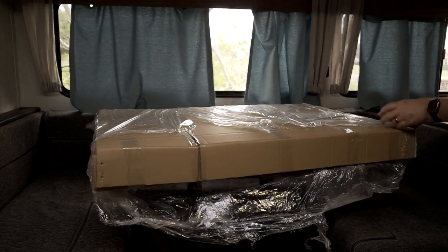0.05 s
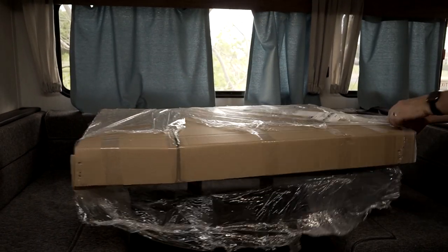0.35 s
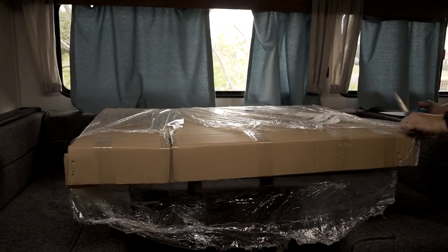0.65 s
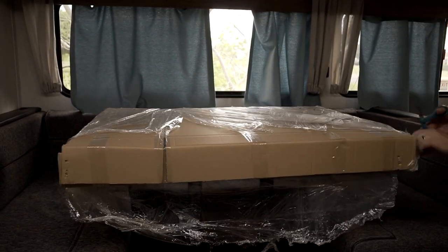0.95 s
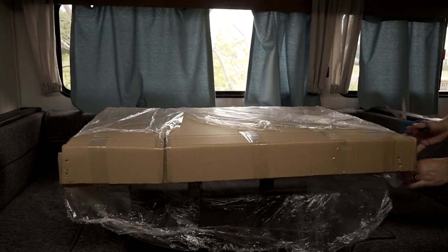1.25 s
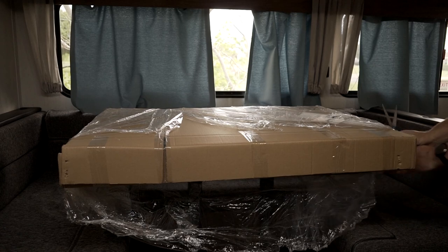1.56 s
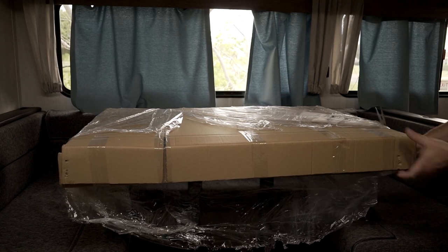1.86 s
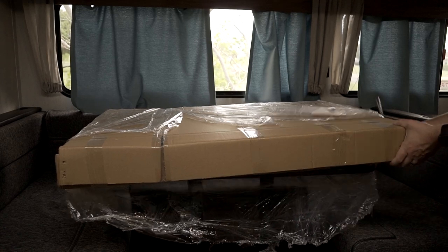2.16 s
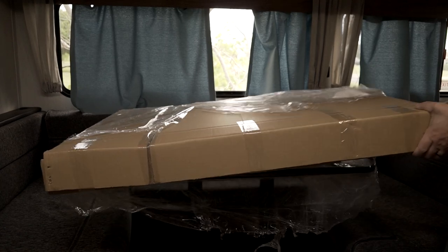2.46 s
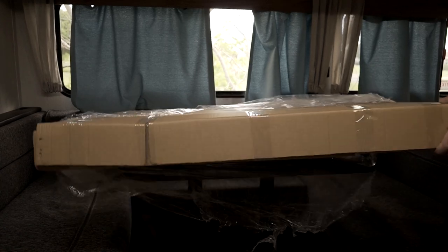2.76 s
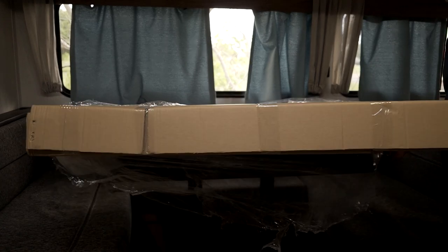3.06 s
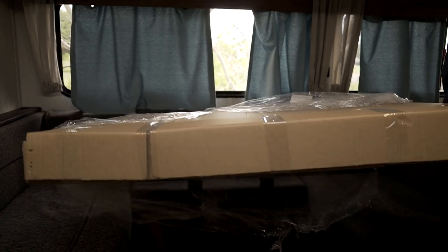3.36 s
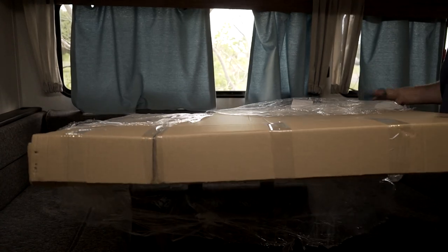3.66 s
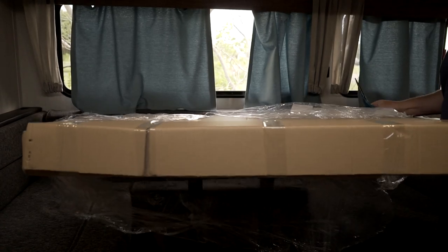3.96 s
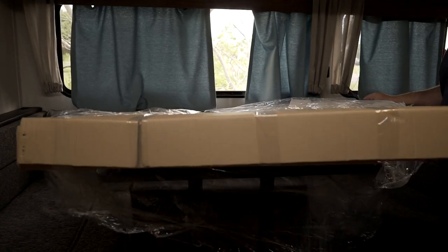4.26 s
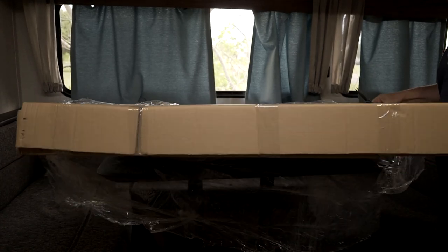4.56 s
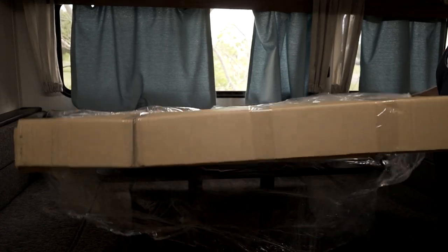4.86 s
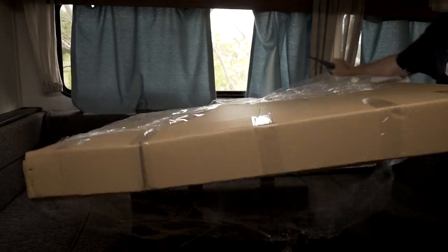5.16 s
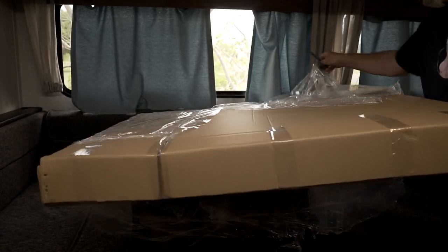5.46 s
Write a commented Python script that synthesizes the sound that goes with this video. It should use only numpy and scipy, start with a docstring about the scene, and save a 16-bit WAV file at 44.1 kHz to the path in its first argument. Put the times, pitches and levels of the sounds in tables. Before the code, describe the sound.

Clear plastic wrap crinkles and snaps in uneven tugs as it is pulled off a big cardboard box that scrapes and bumps.

```python
"""Clear plastic wrap crinkles as it is pulled off a big cardboard box, shifted and lifted in a camper cabin.
Each tug makes thousands of creases buckle (snap-through), singly and in flurries, and clinging film
peels off in a row of ticks. Stick-slip friction and impacts excite the panel modes of the box, which
drums, bumps and judders. The small, padded cabin adds a faint rumble and a short, dense reverberation."""
import sys
import numpy as np
from scipy import signal
from scipy.fft import rfft, irfft
from scipy.io import wavfile

SR = 44100
rng = np.random.default_rng(int(sys.argv[2]) if len(sys.argv) > 2 else 0)


def generate_wav(signal):
    """Clip the signal to [-1, 1] and save it as 16-bit WAV at the path in sys.argv[1]."""
    frames = np.transpose(np.atleast_2d(signal))
    scaled = np.clip(frames, -1, 1) * 32767
    pcm = np.round(scaled).astype(np.int16)
    wavfile.write(sys.argv[1], SR, pcm)


N = 242550
TIME = np.arange(N) / SR
CABIN_T60_S = 0.12


def undb(db):
    """Amplitude ratio of a level in decibels."""
    return 10 ** (np.asarray(db) / 20)


def unit(x):
    """Normalisation to rms 1."""
    return x / np.sqrt(np.mean(x ** 2))


def curves(table):
    """Linear interpolation of each column over time."""
    s, *columns = np.transpose(table)
    return [np.interp(TIME, s, c) for c in columns]


def add(out, s, sound):
    """Superposition of a sound from time s."""
    start = max(int(s * SR), 0)
    out[:, start:start + sound.shape[1]] += sound[:, :N - start]


def ring(x, hz, width_hz):
    """Damped resonance: two poles, gain 1 at the centre."""
    w = 2 * np.pi * min(hz, .45 * SR) / SR
    a = np.sin(w) * width_hz / hz / 2
    return signal.lfilter([a, 0, -a], [1 + a, -2 * np.cos(w), 1 - a], x + 1e-18)


def band(x, hz, width_hz):
    """Two resonators in cascade: a short rounded ring with steep skirts."""
    return ring(ring(x, hz, width_hz), hz, width_hz)


def colour(x, points, size=4096):
    """Minimum-phase filter through (f/Hz, gain/dB) points, built from the folded cepstrum."""
    hz, db = np.transpose(points)
    bins = np.maximum(np.arange(size // 2 + 1) * SR / size, 1)
    gain = undb(np.interp(np.log(bins), np.log(hz), db))
    cepstrum = irfft(np.log(gain))
    cepstrum[1:size // 2] *= 2
    cepstrum[size // 2 + 1:] = 0
    response = irfft(np.exp(rfft(cepstrum))).reshape((1,) * (x.ndim - 1) + (-1,))
    return signal.oaconvolve(x, response, axes=-1)[..., :x.shape[-1]]


def wander(rate):
    """Random modulation: `rate` Gaussian values a second, joined linearly; rms 1."""
    steps = np.random.default_rng(rng.integers(2 ** 31)).standard_normal(N // 100)
    return unit(np.interp(TIME * rate, np.arange(len(steps)), steps))


def clicks(rate, spread_db, size=N):
    """Poisson process: `rate` impulses a second from random directions, as mid and side; rms 1."""
    chance = np.clip(rate / SR, 1e-5, 1) * np.ones(size)
    at = np.flatnonzero(rng.random(size) < chance)
    strength, sign, direction = np.random.default_rng(rng.integers(2 ** 31)).random((len(at), 3)).T
    rank = -np.log(strength + .006)  # many small, few large
    out = np.zeros((2, size))
    out[0, at] = np.sign(sign - .5) * undb(spread_db * rank) / np.sqrt(chance[at])
    out[1, at] = out[0, at] * np.sqrt(2) * np.cos(np.pi * direction)
    return unit(out + 1e-12)


def scatter(x, wet_db):
    """Diffuse reverberation: each slip comes from a new spot and has its own decaying reflections."""
    keep = undb(-120 / (CABIN_T60_S * SR))  # energy left after one sample
    energy = signal.lfilter([0, 1 - keep], [1, -keep], x[0] ** 2 + 1e-18)
    spray = np.sqrt(energy) * rng.standard_normal(x.shape)
    return (x + undb(wet_db) * spray) / np.sqrt(1 + undb(wet_db) ** 2)


def early_echoes(x, wet_db, size=1200):
    """Interference: unchanging reflections from the nearest walls and the window colour the sound."""
    t = np.arange(size) / SR
    echoes = rng.standard_normal((2, size)) * undb(-60 * t / CABIN_T60_S) * (t > .002)
    return x + undb(wet_db) * signal.oaconvolve(x[:1], unit(echoes) / np.sqrt(size), axes=1)[:, :N]


# Spectrum of the still cabin: f/Hz, gain/dB
CABIN_SPECTRUM = [(20, -20), (50, -16), (100, -2), (300, 0), (1000, -4.5), (16000, -36)]
# Course of its rumble: t/s, level/dB
RUMBLE_LEVELS = [(0, -68), (1, -66), (3, -62), (5.5, -57.5)]
def cabin_rumble():
    """Filtered Gaussian noise: a faint low rumble that slowly grows."""
    level_db, = curves(RUMBLE_LEVELS)
    return undb(level_db) * unit(colour(rng.standard_normal((2, N)), CABIN_SPECTRUM))


# Stirred film crinkling between tugs: t/s, level/dB, tautness/dB (fine creases up, broad folds down)
SETTLING = [(0, -41.5, 1), (.1, -46, 1), (.4, -37, -0.5), (1.1, -36.5, 2.5), (1.65, -40, 0),
            (1.87, -43, -1), (3.6, -44.5, 1.5), (4.35, -51, 2), (4.47, -48, 4), (4.72, -51, 3),
            (5.5, -45.5, 2)]
# Tugs on the film: t/s, rise/s, hold/s, release/s, crinkle level/dB, share of broad folds/dB,
# share of fine creases/dB, drag level/dB, drumming level/dB
TUGS = [(0.141, 0.022, 0.0092, 0.038, -34, -10, 0, -35.5, -52),
        (0.221, 0.039, 0.016, 0.077, -26, -5, -4.5, -33, -43.5),
        (0.411, .02, 0.087, .11, -39, -11, -3, -36, -51),
        (0.798, 0.01, 0.0049, 0.03, -28, -19, -3, -34.5, -51),
        (1.222, .045, .035, 0.036, -26.5, -1, 2.5, -31, -49), (1.349, .03, .01, .04, -32, 1, 4.5, -37, -65),
        (1.471, 0.059, .02, 0.048, -32.5, 0, 1, -42.5, -58),
        (1.699, 0.013, 0.024, 0.068, -31.5, -1.5, -3.5, -42.5, -52),
        (1.917, 0.029, 0.066, 0.049, -38, -1, 1, -45.5, -53),
        (2.11, .05, .025, 0.069, -27.5, -1, 0.5, -31.5, -45),
        (2.19, .07, .03, .18, -27, -3, 2.5, -34.5, -47),
        (2.418, .06, 0.14, 0.081, -29, -1.5, 1, -35.5, -52),
        (2.717, 0.018, .24, 0.28, -35, 0.5, 0.5, -37.5, -48),
        (3.124, .025, 0.088, 0.046, -30, -1.5, -2.5, -35.5, -51),
        (3.167, .028, 0.01184, 0.039, -38, 1, -19, -28, -52),
        (3.324, 0.018, 0.0054, 0.028, -42, 2, -14, -46, -66),
        (3.439, 0.041, 0.034, 0.038, -41.5, 1, 1.5, -46, -62),
        (3.75, 0.023, 0.059, 0.088, -37.5, 0, 2, -43.5, -54),
        (4.077, .06, 0.063, 0.024, -41, 0.5, -4.5, -38.5, -50.5),
        (4.367, 0.039, 0.014, 0.043, -52.5, 0, 3, -46, -49.5),
        (4.762, 0.13, .03, .245, -24.5, -2, 1, -27.5, -41.5),
        (5.186, 0.021, 0.0058, .03, -33.5, -6, 6, -55, -62)]
def tugging(rest_slack_db=-0.5, brush_mean_db=-47, brush_follow=0.39, rest_drum_db=-12.5):
    """Incoherent sources add in power: tugs and settling film give the five dB curves of TUGS."""
    rest_db, tension_db = curves(SETTLING)
    brush_db = brush_mean_db + brush_follow * (rest_db - rest_db.mean())  # loose film brushes the box
    power = undb([rest_db, rest_db + rest_slack_db - tension_db, rest_db + tension_db,
                  brush_db, brush_db + rest_drum_db]) ** 2
    for s, rise, hold, release, db, slack_db, taut_db, drag_db, drum_db in TUGS:
        fade = np.exp(-np.maximum(TIME - s - rise - hold, 0) / release)
        effort = np.clip((TIME - s) / rise, 0, 1) * fade
        power += np.outer(undb([db, db + slack_db, db + taut_db, drag_db, drum_db]) ** 2, effort ** 2)
    crinkle, broad, fine, drag, drum = power
    return 10 * np.log10([crinkle, broad / crinkle, fine / crinkle, drag, drum])


# Spectrum of the crinkling film: f/Hz, gain/dB
FILM_SPECTRUM = [(400, -31), (900, -17), (1400, -5), (2000, 0.5), (3000, 0.5), (4500, 0), (7000, -2),
                 (9500, -6.5), (12500, -7.5), (16000, -11.5)]
def crinkling(level_db, slack_db, taut_db, crowding=.45, breadth=0.98, gain_db=7.0, bands=12):
    """Buckling: creases of many sizes snap and ring for a cycle or two; a harder pull sets off more."""
    out = 0
    snaps_per_s = 420 * undb(crowding * (level_db + 33))  # in each band
    for hz in np.geomspace(1200, 14000, bands):
        # slack film buckles in broad low folds, taut film in fine high creases
        broad = np.clip(np.log2(4300 / hz) * 0.96, 0, 1)
        fine = np.clip(np.log2(hz / 5000) * 1.3, 0, 1)
        pops = scatter(clicks(snaps_per_s, spread_db=0), wet_db=0)
        creases = unit(band(pops, hz, breadth * hz))
        out += creases * np.sqrt(hz / 5500 / bands) * undb(level_db + broad * slack_db + fine * taut_db)
    return undb(gain_db) * colour(out, FILM_SPECTRUM)


# Modes of the cardboard panels: f/Hz, bandwidth/Hz, gain/dB
PANEL_MODES = [(156.3, 5.8, 0.5), (214, 35, -1.5), (263, 46, 0), (304, 45, -13.5), (403, 84, 2),
               (534.5, 43, 10.5), (610, 76, 0.5), (758, 260, 0.5), (951, 78, -3.5), (1153, 41, -8),
               (1790, 110, -9.5)]
def cardboard(push, dead_db=-3):
    """Modal superposition: the box answers a force with a dead knock and its panel resonances."""
    return undb(dead_db) * push + sum(undb(db) * ring(push, hz, width) for hz, width, db in PANEL_MODES)


# Force spectrum of film dragging over cardboard: f/Hz, gain/dB
DRAG_SPECTRUM = [(250, -21), (420, -4), (540, -7.5), (700, -1), (850, 1.5), (1000, 2), (1300, 3.5),
                 (1800, 3), (3500, -21.5)]
# Force spectrum of the handling that drums the panels: f/Hz, gain/dB
DRUM_SPECTRUM = [(25, -16), (50, -20), (100, -41.5), (150, -3), (200, -4), (280, 1), (390, 2), (480, -5.5),
                 (800, -17.5)]
def rubbing(drag_db, drum_db):
    """Stick-slip friction at the contact patches shakes the box: a rasping drag and a low drumming."""
    drag_slips = scatter(clicks(rate=800, spread_db=1), wet_db=0.5)
    drum_slips = scatter(clicks(rate=600, spread_db=0), wet_db=-15.5)
    drag = unit(cardboard(colour(drag_slips, DRAG_SPECTRUM)))
    drum = unit(cardboard(colour(drum_slips, DRUM_SPECTRUM)))
    return drag * undb(drag_db - 0.5) + drum * undb(drum_db)


# The box landing on its support: t/s, level/dB, contact f/Hz, rise/s, relative thud level/dB
BUMPS = [(.157, -39, 249, .0026, -44), (.617, -42, 330, .0028, -44), (1.236, -23, 538.8, 0.00051, -42),
         (1.237, -32.5, 270.3, 0.001, -35), (1.378, -40.5, 280, 0.0016, -21), (1.762, -44, 350, .002, -34),
         (1.822, -44, 348.7, 0.0018, -36), (1.938, -38.5, 430, 0.002, -20),
         (2.583, -36, 341.2, 0.0017, -20.5), (2.729, -33.5, 660, 0.00089, -35),
         (3.186, -22, 496, 0.0058, -48), (3.205, -36.5, 400, 0.0036, -40), (3.782, -41.5, 490, 0.0014, -28),
         (4.325, -42.5, 421, .0024, -26), (4.884, -37, 300.3, 0.0031, -26)]
def bumps(breadth=0.95, decay_s=0.024, thud_hz=68, thud_decay_s=0.082, gain_db=-1, size=16000):
    """Impact excitation: a short scuff rings the panels, and the box's weight thuds in the support."""
    out, t = np.zeros((2, N)), TIME[:size]
    for s, db, hz, rise, thud_db in BUMPS:
        force = (1 - np.exp(-t / rise)) ** 2 * np.exp(-t / decay_s)
        force /= force.max()
        slips = clicks(rate=2500, spread_db=1, size=size)
        scuff = band(slips * force, hz, breadth * hz)
        knock = unit(cardboard(scuff, dead_db=-21)) * np.sqrt(np.mean(force ** 2))
        thud = unit(ring(slips, thud_hz, thud_hz)) * np.exp(-t / thud_decay_s) * undb(thud_db)
        add(out, s, (knock + thud) * undb(db + gain_db))
    return out


# Single stiff creases: t/s, peak level/dB, f/Hz
STIFF_CREASES = [(0.257, -14, 5500), (0.457, -19, 5160), (0.5117, -11.5, 5940), (.519, -15, 12240),
                 (.589, -16, 6500), (0.8059, -9, 6520), (0.9132, -20, 5500), (1.0242, -10, 10600),
                 (1.2373, -9.5, 5000), (1.3024, -12.5, 9000), (1.3464, -9, 7000), (2.741, -13.5, 4190),
                 (3.1438, -11.5, 8060), (3.3446, -27, 5950), (3.6967, -21, 6930), (4.14, -19, 6220),
                 (4.202, -18, 5400), (4.214, -19.5, 5600), (4.749, -21, 8140), (4.8298, -6.5, 7270),
                 (4.876, -9, 10170), (4.9, -8.5, 3673), (5.2093, -15, 8810)]
def snaps(rows, breadth=0.99, size=6000):
    """Snap-through: a stiff crease pops into a new shape with one sharp tick of two or three cycles."""
    out, pop = np.zeros((2, N)), signal.unit_impulse(size)
    for (s, db, hz), side in zip(rows, rng.uniform(-1, 1, len(rows))):
        tick = band(scatter(np.outer([1, side], pop), wet_db=2), hz, breadth * hz)
        add(out, s, tick / np.abs(tick[0]).max() * undb(db))
    return out


# Folds giving way: t/s, level/dB, f/Hz, bandwidth/Hz, decay/s
FLURRIES = [(0.33, -22.5, 3180, 3100, 0.014), (.416, -31.5, 1130, 600, 0.013),
            (.709, -25.5, 2097, 2000, .018), (.864, -27, 3200, 1400, .009), (.912, -28, 5000, 5010, .015),
            (.988, -29, 4970, 5000, .024), (1.02, -32, 10900, 4000, 0.037),
            (1.238, -23.5, 2280, 4000, 0.016), (1.269, -30, 5500, 7000, 0.019),
            (1.377, -18, 2800, 3000, 0.0055), (2.116, -28, 4220, 6000, 0.043),
            (2.136, -23.5, 7100, 9000, 0.013), (2.144, -26, 1920, 900, .03),
            (2.257, -25, 8020, 9050, 0.021), (2.551, -27, 2804, 2470, 0.032),
            (3.737, -30.5, 3450, 1099, 0.0078), (3.911, -31, 3196, 1988, 0.03),
            (4.138, -26, 5150, 5500, 0.014), (4.182, -32.5, 1770, 1204, 0.0086),
            (4.469, -35.5, 7950, 5000, 0.0075), (4.587, -36.5, 7840, 8000, .016),
            (4.746, -33, 6010, 9560, 0.069)]
def flurries(rise_s=0.0015, size=12000):
    """Avalanche: one snap trips its neighbours along a fold, and the run decays exponentially."""
    out, t = np.zeros((2, N)), TIME[:size]
    for s, db, hz, width, decay in FLURRIES:
        pops = scatter(clicks(rate=3000, spread_db=2, size=size), wet_db=-2)
        envelope = (1 - np.exp(-t / rise_s)) * np.exp(-t / decay)
        add(out, s, unit(band(pops, hz, width)) * envelope * undb(db))
    return out


def peeling(start_s=2.382, ticks_per_s=88, jitter_s=0.0013, db=-16, spread_db=1.5, hz=8900, count=10):
    """Adhesion fails stepwise: clinging film lets go in quick, nearly even ticks; rows for snaps()."""
    return [(start_s + k / ticks_per_s + jitter_s * late, db + spread_db * strength, hz)
            for k, (late, strength) in enumerate(rng.standard_normal((count, 2)))]


def judder(start_s=4.801, length_s=.5, slips_per_s=19, mode_hz=528, width_hz=70,
           slip_db=-32, stick_db=-8.5, taper_db=-11):
    """Periodic stick-slip: the lifted box's edge catches and slides; its strongest panel mode groans."""
    t = TIME - start_s
    slid = np.clip(t / length_s, 0, 1)
    stuck = np.cos(np.pi * slips_per_s * t) ** 2
    level_db = slip_db + stick_db * stuck + taper_db * (2 * slid - 1) ** 2  # loudest in mid-slide
    groan = unit(band(clicks(rate=500, spread_db=0.48), mode_hz, width_hz))
    return groan * undb(level_db) * (slid > 0) * (slid < 1)


# Stereo width, narrowest in the bass: f/Hz, side gain/dB
STEREO_WIDTH = [(100, -20), (300, -17), (550, -14.5), (1000, -9), (2000, -7), (4000, -4.5), (8000, -1.1),
                (14000, -2.5)]
def scene():
    """Superposition of all sources as mid and side, whose sum and difference give left and right."""
    level_db, slack_db, taut_db, drag_db, drum_db = tugging()
    catch_db = 0.3 * wander(rate=50)  # the film catches and gives at random
    film = crinkling(level_db + catch_db, slack_db, taut_db)
    film += snaps(STIFF_CREASES + peeling()) + flurries()
    film = early_echoes(film, wet_db=-17)
    friction = rubbing(drag_db + catch_db, drum_db + catch_db)
    mid, side = film + friction + cabin_rumble() + bumps() + judder()
    side = colour(side, STEREO_WIDTH)
    return np.array([mid + side, mid - side])


def record(dry, low_cut_hz=40, top_hz=16000):
    """Band limiting: a gentle high-pass thins the deepest bass and a steep low-pass cuts the top."""
    thinned = signal.sosfilt(signal.butter(2, low_cut_hz, "high", fs=SR, output="sos"), dry)
    return signal.sosfilt(signal.ellip(12, .1, 80, top_hz, fs=SR, output="sos"), thinned)


dry = scene()
out = record(dry)
generate_wav(out)
```